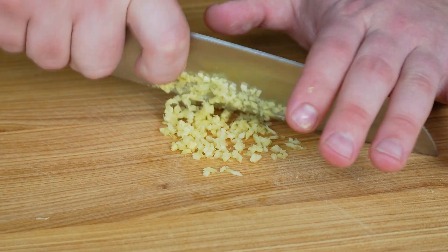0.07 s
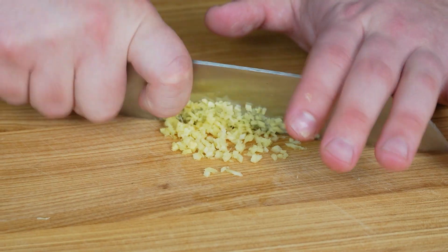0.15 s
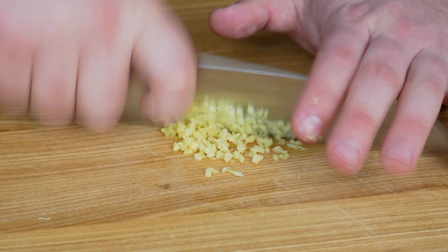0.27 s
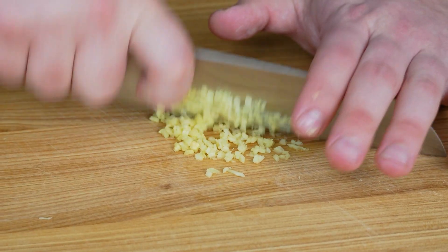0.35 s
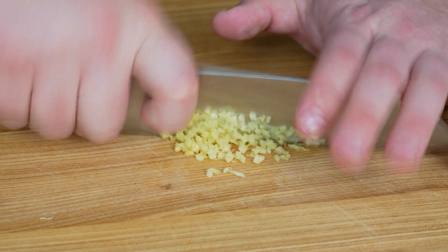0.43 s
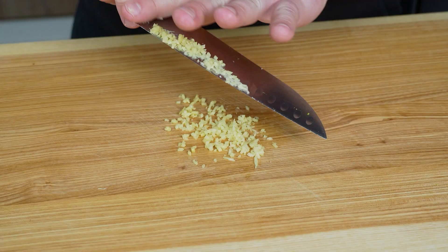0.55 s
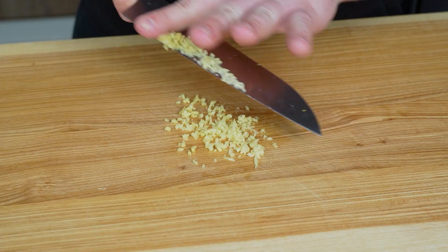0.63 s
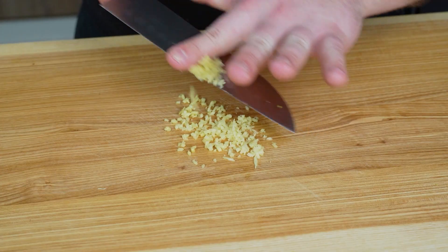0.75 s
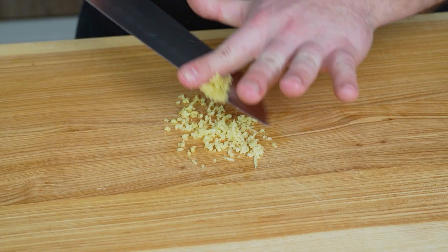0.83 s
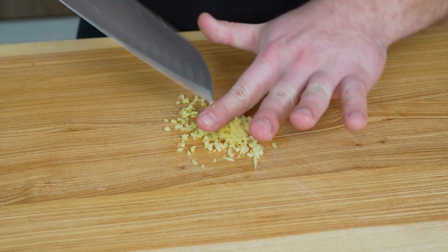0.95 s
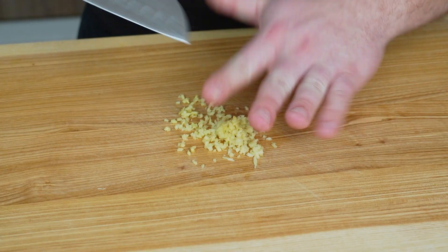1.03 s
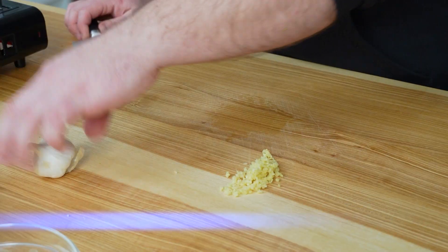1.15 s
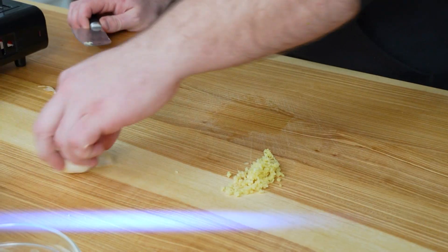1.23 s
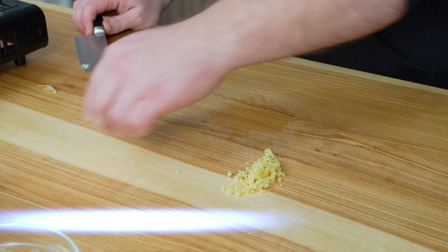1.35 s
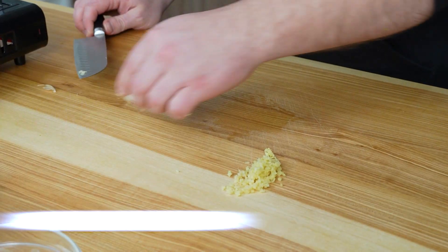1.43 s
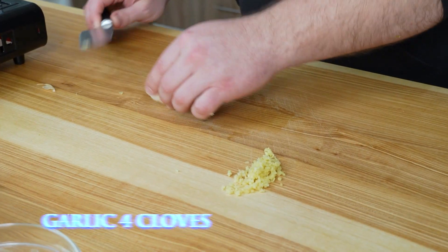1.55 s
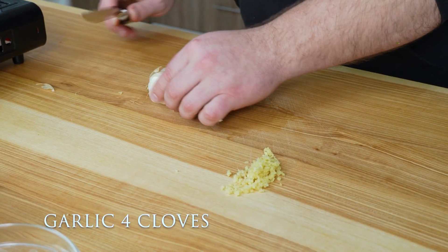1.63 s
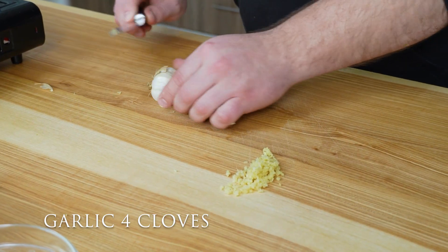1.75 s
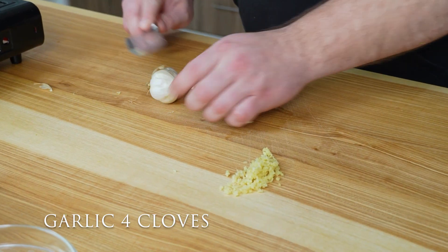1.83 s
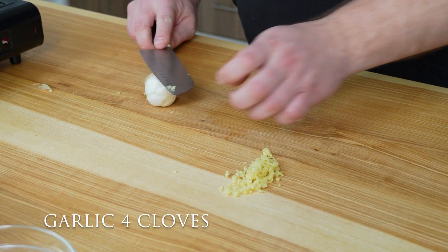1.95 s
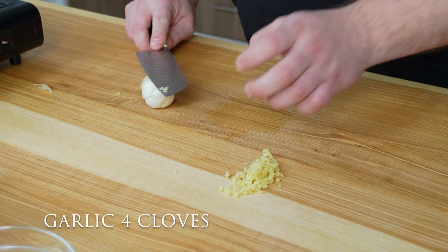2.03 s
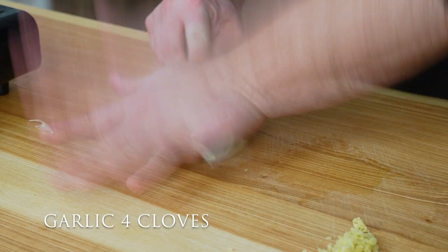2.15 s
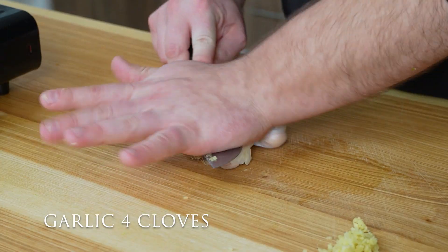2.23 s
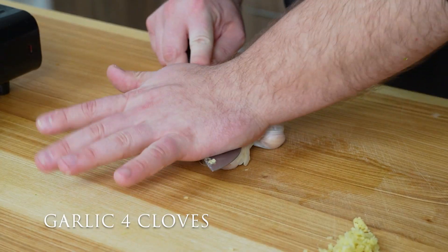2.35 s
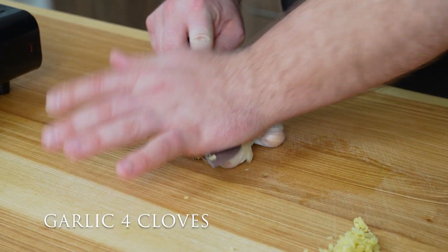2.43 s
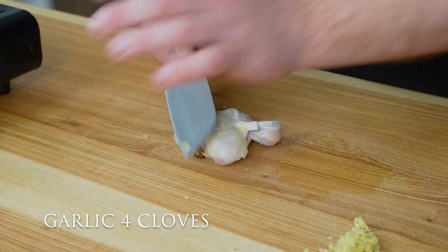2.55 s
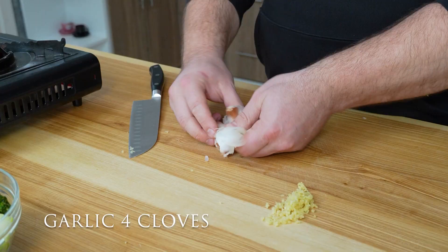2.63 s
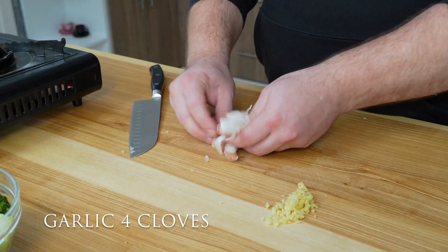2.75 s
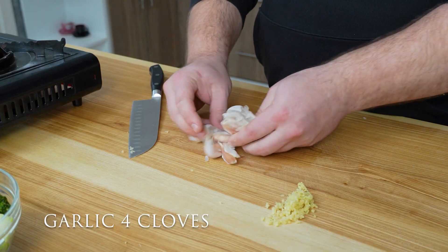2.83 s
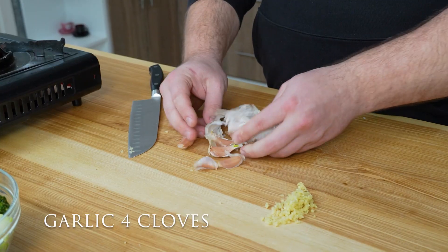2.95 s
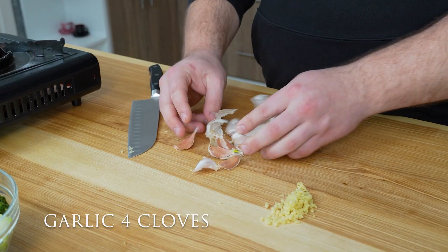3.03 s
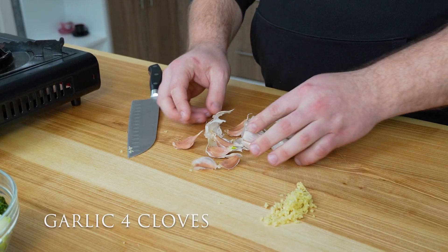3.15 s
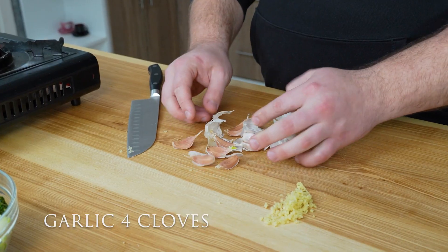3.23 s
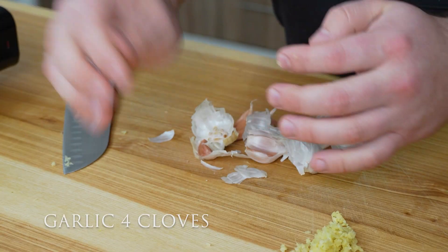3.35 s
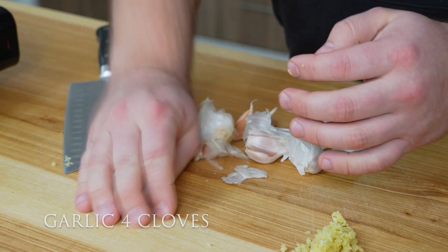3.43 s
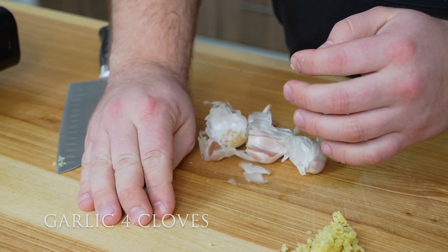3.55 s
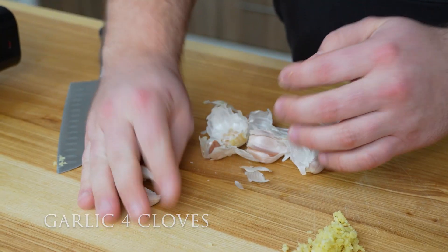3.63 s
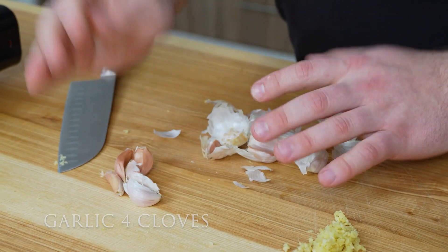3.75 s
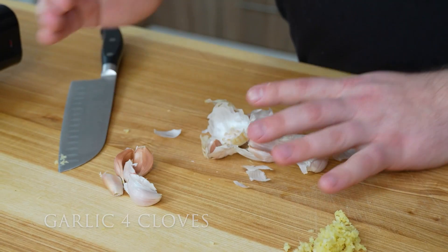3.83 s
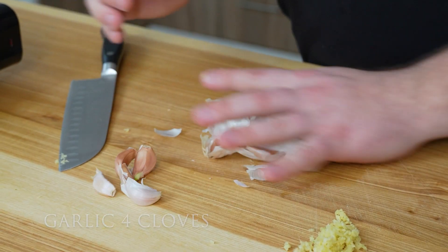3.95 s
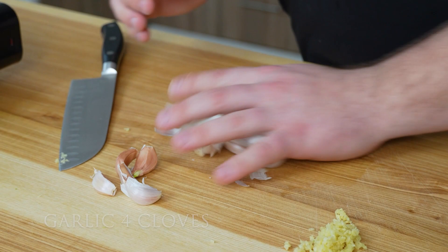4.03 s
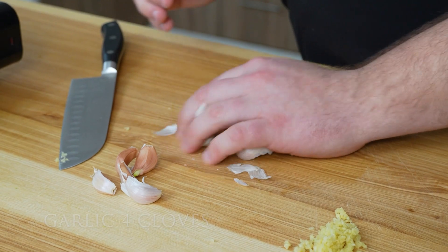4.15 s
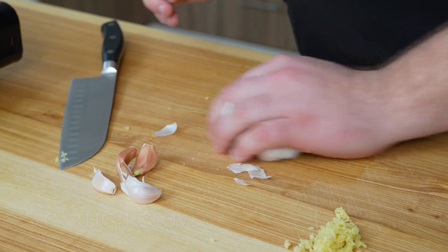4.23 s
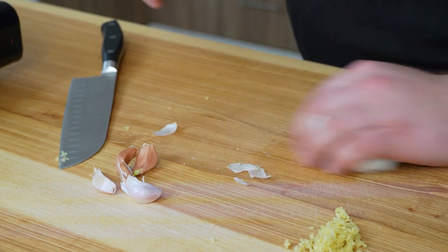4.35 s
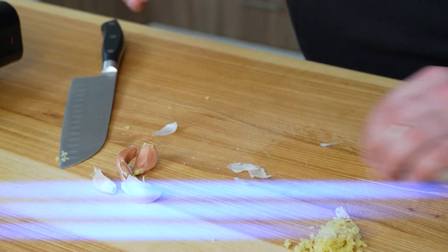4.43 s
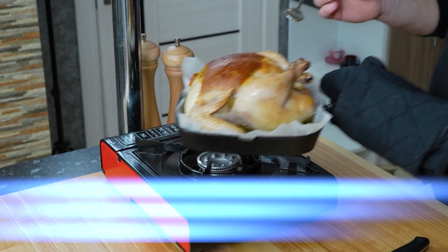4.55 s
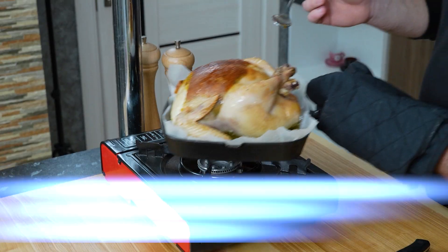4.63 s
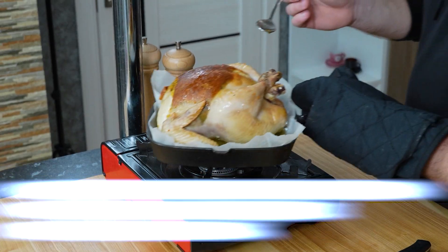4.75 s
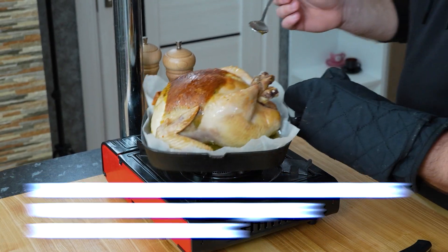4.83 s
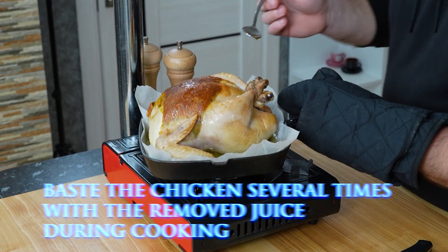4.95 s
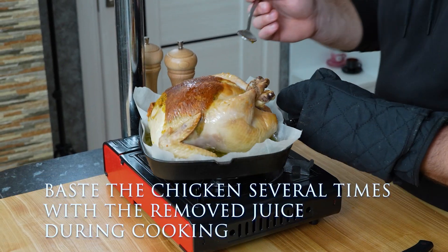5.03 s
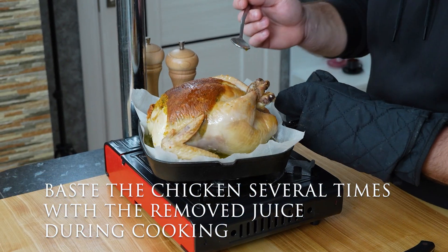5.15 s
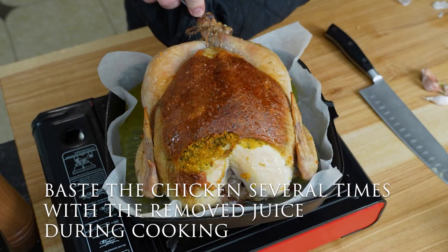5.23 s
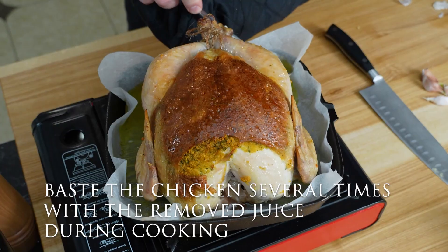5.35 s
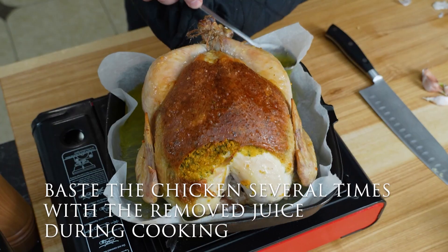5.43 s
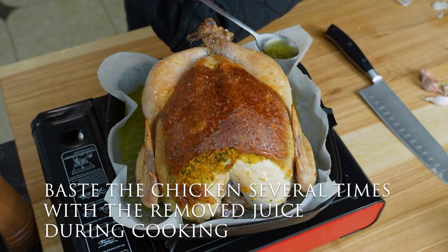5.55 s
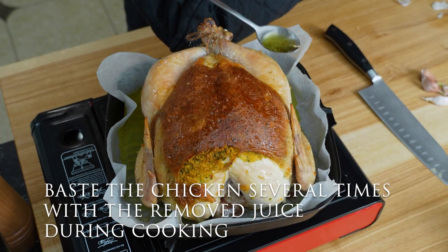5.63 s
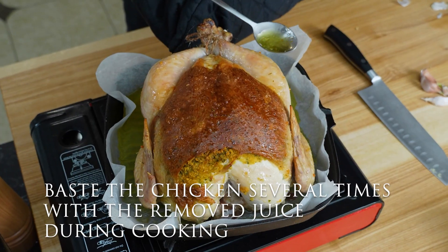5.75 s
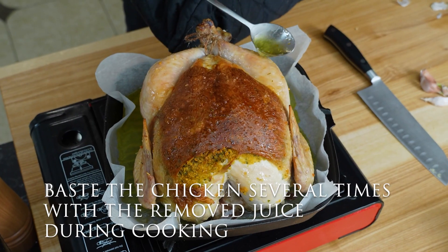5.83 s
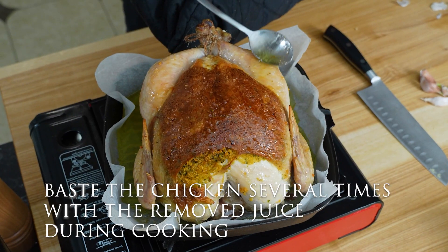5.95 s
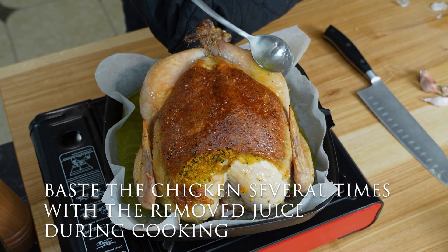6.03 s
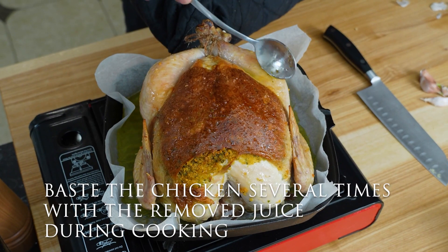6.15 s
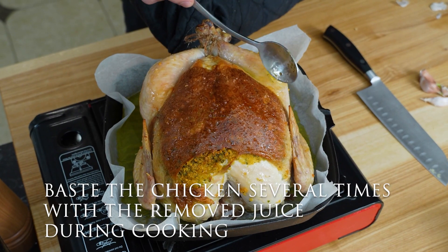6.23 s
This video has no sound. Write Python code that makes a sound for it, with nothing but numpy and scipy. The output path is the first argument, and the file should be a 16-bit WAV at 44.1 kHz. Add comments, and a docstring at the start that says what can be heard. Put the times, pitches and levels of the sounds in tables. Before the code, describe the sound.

Four knife chops on a wooden board, a garlic bulb smashed and peeled with papery crackles, then a pan clanks onto a stove in a ringing kitchen.

```python
"""Cooking in a bare, ringing kitchen, heard in five shots joined by hard cuts; faint air and a fan run on.
At the board a knife minces ginger and fingers wipe it off; a garlic bulb is set down, smashed under the
flat blade and pulled apart, and its husks are swept away. Then a pan clanks onto a portable stove and a
spoon dips into its juice. Blows are coloured noise bursts and struck modes, husks and paper are showers
of grains; noise echoes set the distance: the husks sound nearest, the smash deepest in the room."""
import sys
import numpy as np
from scipy import signal
from scipy.fft import rfft, irfft, next_fast_len
from scipy.io import wavfile
from scipy.ndimage import uniform_filter1d

SR = 44100
rng = np.random.default_rng(int(sys.argv[2]) if len(sys.argv) > 2 else 0)


def pcm_store(signal):
    """Save signal as 16-bit PCM."""
    levels = np.round(np.clip(np.atleast_2d(signal), -1, 1) * 32767)
    wavfile.write(sys.argv[1], SR, levels.astype(np.int16).T)


N = 276943
TOP_HZ = 16000  # upper limit of the sound
HIT_SIZE = 16384  # samples in a ringing hit
AGE = np.arange(HIT_SIZE) / SR  # s since a blow
TIME = np.arange(N) / SR  # s since the start


def amp(db):
    """Decibels to gain."""
    return 10 ** (np.asarray(db) / 20)


def fade(age, t60):
    """Exponential decay, 60 dB in t60 seconds."""
    return np.exp(-np.log(1000) * age / t60)


def level(x, db):
    """Set the rms level."""
    return x * amp(db) / np.std(x)


def add(track, s, hit, db):
    """Mix in a hit whose energy equals 10 ms at the given level."""
    unit_hit = hit / np.sqrt(np.sum(hit ** 2) / (SR / 100))
    part = track[int(s * SR):][:len(hit)]
    part += (unit_hit * amp(db))[:len(part)]


def colour(x, tone, tilt_db=0):
    """Causal minimum-phase filter through (frequency [Hz], density [dB per Hz]) points, tilted per octave."""
    size = next_fast_len(len(x) // 2 + 2048) * 2
    octave = np.log2(np.maximum(np.fft.rfftfreq(size, 1 / SR), 1))
    hz, db = np.transpose(tone)
    tilt = tilt_db * np.clip(octave, np.log2(200), np.log2(TOP_HZ))
    gain = amp(np.interp(octave, np.log2(hz), db) + tilt)
    # folding the cepstrum onto positive times makes the filter causal
    cepstrum = irfft(np.log(gain))
    cepstrum[1:size // 2] *= 2
    cepstrum[size // 2 + 1:] = 0
    return irfft(rfft(x, size) * np.exp(rfft(cepstrum)))[:len(x)]


def burst(t60, rise=0.00037, count=2, size=6144):
    """Countless short vibrations after a contact: dying noise with an even spectrum."""
    shape = fade(AGE[:size], t60) * (1 - np.exp(-AGE[:size] / rise))
    x = rng.standard_normal(size) * shape
    for _ in range(count):
        # flatten the spectrum, then restore the decay
        spectrum = rfft(x)
        even = irfft(spectrum / (np.abs(spectrum) + 1e-12))
        loudness = np.sqrt(np.abs(uniform_filter1d(even ** 2, 128)) + 1e-12)
        x = even * shape / loudness
    return x


def ring(modes, t60, low_hz=20, high_hz=16000, scatter_db=4.5):
    """Modes struck at a slightly new spot each time; the contact feeds those between low_hz and high_hz."""
    hz, db = np.transpose(modes)[:, :, None]
    size, detune = rng.standard_normal((len(modes), 2)).T[:, :, None]
    contact_loss = np.sqrt((1 + (hz / high_hz) ** 4) * (1 + (low_hz / hz) ** 4))
    gain = amp(db + scatter_db * size) / contact_loss
    side = rng.choice([-1, 1], hz.shape)
    tones = np.sin(2 * np.pi * hz * (1 + 0.012 * detune) * AGE)
    return fade(AGE, t60) * np.sum(side * gain * tones, axis=0)


def contacts(rows, tone):
    """One coloured burst for each row (time [s], level [dB], t60 [s], brightness [dB per octave])."""
    out = np.zeros(N)
    for s, db, t60, tilt_db, *_ in rows:
        add(out, s, colour(burst(t60), tone, tilt_db), db)
    return out


def crackle(tone, rate, spread_db, grain_t60, rub_db, size=256, count=3000):
    """Tiny fractures, each with its own pitch and a very unequal size, over a smooth rubbing hiss; rms 1."""
    length = int(count / rate * SR)
    when, pitch, luck = rng.random((count, 3)).T[:, :, None]
    strength = amp(spread_db * np.minimum(-np.log(luck), 4))
    tones = np.sin(2 * np.pi * TOP_HZ * pitch * AGE[:size])
    grains = strength * fade(AGE[:size], grain_t60) * tones
    places = (when * length).astype(int) + np.arange(size)
    shower = np.bincount(places.ravel(), grains.ravel(), length)[:length]
    hiss = amp(rub_db) * rng.standard_normal(length)
    return level(colour(level(shower, 0) + hiss, tone), 0)


RUB_RANGE_DB = 30  # rise within one attack time, fall within one release time


def rubbing(rows, attack_s, release_s):
    """Gain of a series of rubs (time [s], hold [s], level [dB]): each swells, holds and dies away."""
    power = 0
    for s, hold_s, db in rows:
        before = np.maximum(s - TIME, 0) / attack_s
        after = np.maximum(TIME - s - hold_s, 0) / release_s
        power = power + amp(db - RUB_RANGE_DB * np.minimum(before + after, 10)) ** 2
    return np.sqrt(power)


def kitchen(early_db, late_db, treble_db, early_t60=0.047, t60_low=0.4, t60_mid=0.54, t60_top=0.33,
            gap=0.0034, build=0.0013):
    """Echo of the room: direct sound, quick returns from worktop and cupboards, then a long dense tail."""
    age = np.arange(SR) / SR
    octave = np.log2(np.maximum(np.fft.rfftfreq(SR, 1 / SR), 1))
    centres = np.log2([250, 1000, 4000, 14000])
    early = amp(early_db) * fade(age, early_t60) / np.linalg.norm(fade(age, early_t60))
    noise, echo = rfft(rng.standard_normal(SR)), 0
    band_t60s = (t60_low, t60_mid, t60_mid, t60_top)
    band_dbs = (0, 0, treble_db / 2, treble_db)
    # treble_db sets how much treble returns; the tail of the top band dies soonest
    for share, t60, db in zip(np.eye(4), band_t60s, band_dbs):
        late = amp(late_db) * fade(age, t60) / np.linalg.norm(fade(age, t60_mid))
        band = irfft(noise * np.interp(octave, centres, share), SR)
        echo = echo + band * np.hypot(early, late) * amp(db)
    onset = 1 - np.exp(-np.maximum(age - gap, 0) / build)
    return (age == 0) + echo * onset


# spectrum of the air in the kitchen: (frequency [Hz], density [dB per Hz])
AIR_SPECTRUM = [(15, -26.5), (25, -1), (48, -3), (62, -9.5), (100, -3.5), (170, -8), (280, -9), (450, -5.5),
                (680, -10.5), (920, -8), (1300, -17), (2200, -22.5), (3900, -27.5), (4400, -32.5),
                (8000, -39), (12500, -42.5), (16000, -55.5)]
AIR_DB = -69  # rms
# whirr of a fan: (centre [Hz], width [Hz], rms level [dB])
FAN_BANDS = [(326.8, 15, -82), (454, 14, -77.5), (674, 25, -79), (907.5, 36, -84.5), (3600, 180, -89)]


def room_tone():
    """Faint steady air, shaped noise, with the narrow noise bands of a fan."""
    out = level(colour(rng.standard_normal(N), AIR_SPECTRUM), AIR_DB)
    size = next_fast_len(N)
    f, noise = np.fft.rfftfreq(size, 1 / SR), rfft(rng.standard_normal(size))
    for hz, width, db in FAN_BANDS:
        band = irfft(noise / (1 + (2 * (f - hz) / width) ** 2), size)[:N]
        out += level(band, db)
    return out


# dry husk under the fingers: (frequency [Hz], density [dB per Hz])
HUSK_SPECTRUM = [(150, -20.5), (380, -18.5), (540, 1), (800, -7), (1200, -5.5), (2100, -2), (3500, 4),
                 (5200, 5), (7000, -2.5), (12500, -8), (16000, -11)]
# fingers wiping ginger off the blade, then brushing the board: (time [s], hold [s], level [dB])
WIPES = [(.63, .02, -92), (1.02, 0.037, -81.5), (1.36, 0.048, -68), (1.69, .02, -87), (1.83, .01, -78)]
WIPE_ATTACK_S, WIPE_RELEASE_S = 0.23, 0.29


def wiping():
    """Fingertips wipe and brush: more smooth hiss than grains."""
    wipe = crackle(HUSK_SPECTRUM, rate=2000, spread_db=2, grain_t60=.004, rub_db=4)
    return np.resize(wipe, N) * rubbing(WIPES, WIPE_ATTACK_S, WIPE_RELEASE_S)


# baking paper in the pan: (frequency [Hz], density [dB per Hz])
PAPER_SPECTRUM = [(300, -25.5), (900, 3), (1500, -4), (2500, -3.5), (5300, -9), (7000, -19), (11000, -21.5),
                  (16000, -37.5)]
# its rustles: (time [s], hold [s], level [dB])
RUSTLES = [(4.84, .15, -64.5), (5.29, 0.038, -63.5)]
RUSTLE_ATTACK_S, RUSTLE_RELEASE_S = 0.16, 0.15


def rustling_paper():
    """Creases give one by one in the baking paper, over a rubbing hiss."""
    paper = crackle(PAPER_SPECTRUM, rate=1900, spread_db=4.5, grain_t60=.004, rub_db=3)
    return np.resize(paper, N) * rubbing(RUSTLES, RUSTLE_ATTACK_S, RUSTLE_RELEASE_S)


# snap of dry husk: (frequency [Hz], density [dB per Hz])
SNAP_SPECTRUM = [(200, -28), (600, -38), (1200, -3), (2200, 2.5), (3600, 5.5), (5200, 7), (6800, 1.5),
                 (9000, 1.5), (13000, -2), (16000, -8.5)]
# single snaps: (time [s], level [dB], t60 [s], brightness [dB per octave])
HUSK_SNAPS = [(1.262, -52.5, 0.26, 1.5), (1.291, -48.5, 0.11, -1.5), (1.323, -40.5, 0.19, -1),
              (1.568, -63, 0.023, 14), (1.615, -55.5, 0.059, -1.5), (1.6442, -45, 0.098, 2),
              (1.939, -61, .095, -0.5), (1.9621, -37.5, 0.1, 1), (2.376, -38.5, 0.023, -2),
              (2.608, -47, .012, -2), (2.6707, -41.5, 0.055, 3), (3.3172, -59.5, .02, -2),
              (4.158, -39.5, 0.12, 0), (4.173, -42.5, 0.031, -5.5), (4.5006, -46, 0.0046, -5)]


def husk_snaps():
    """Papery skins snap when touched: short dry bursts."""
    return contacts(HUSK_SNAPS, SNAP_SPECTRUM)


# pulls on the husk: (time it gives [s], hold [s], crackle level [dB])
PULLS = [(2.532, 0.084, -53), (2.706, .01, -44.5), (2.728, 0.019, -39), (2.824, 0.014, -42),
         (2.911, 0.13, -48), (3.168, 0.0083, -55.5), (3.457, 0.043, -65.5)]
PULL_ATTACK_S, PULL_RELEASE_S = 0.09, 0.2
# the snap that ends the build-up: level over the crackle, decay, brightness per octave
GIVE_DB, GIVE_T60_S, GIVE_TILT_DB = 4.5, 0.11, -1.5


def peeling():
    """The crackle builds, the skin gives with a snap, the fingers work on."""
    gives = [(s, db + GIVE_DB, GIVE_T60_S, GIVE_TILT_DB) for s, _, db in PULLS]
    peel = crackle(HUSK_SPECTRUM, rate=4000, spread_db=3.9, grain_t60=.004, rub_db=-4, count=5000)
    pulled = np.resize(peel, N) * rubbing(PULLS, PULL_ATTACK_S, PULL_RELEASE_S)
    return contacts(gives, SNAP_SPECTRUM) + pulled


# husks under the flat hand: (frequency [Hz], density [dB per Hz])
FLAT_HAND_SPECTRUM = [(180, -68), (300, -16), (425, -20), (678, -9.5), (870, -11), (1390, -6.5),
                      (2000, -9.5), (3700, -2.5), (7200, -13), (12700, -17.5), (16000, -22)]
# husks under the cupped hand: (frequency [Hz], density [dB per Hz])
CUPPED_HAND_SPECTRUM = [(240, -56.5), (400, -29), (528, -33), (645, -40), (994, -16), (1200, -14),
                        (1840, -19), (3310, -7), (6850, -15.5), (12700, -20), (16000, -27)]
SWEEP_START_S, SWEEP_LEAVES_S, SWEEP_SPEEDUP_S = 3.927, 4.49, 0.2
# level at full speed before any gathering, gain from gathering, loss as the hand leaves the board
SWEEP_DB, GATHER_DB_PER_S, LEAVE_DB_PER_S = -48, 5.5, 103


def sweeping(cupping=(4.26, 4.38)):
    """Husks slide over the wood, louder with speed and load, as the hand closes on them, until the cut."""
    flat, cupped = (np.resize(crackle(tone, rate=4000, spread_db=3.4, grain_t60=.004, rub_db=-3), N)
                    for tone in (FLAT_HAND_SPECTRUM, CUPPED_HAND_SPECTRUM))
    closed = np.interp(TIME, cupping, (0, 1))
    age = np.maximum(TIME - SWEEP_START_S, 0)
    speed = np.minimum(age / SWEEP_SPEEDUP_S, 1) * (TIME < SHOTS[2][1])
    leaving = LEAVE_DB_PER_S * np.maximum(TIME - SWEEP_LEAVES_S, 0)
    db = SWEEP_DB + GATHER_DB_PER_S * age - leaving
    return speed * amp(db) * (flat * np.sqrt(1 - closed) + cupped * np.sqrt(closed))


# spoon on the paper lining: (frequency [Hz], density [dB per Hz])
SPOON_SPECTRUM = [(400, -42), (800, -24), (1300, 0.5), (1700, -11.5), (2000, 0.5), (2350, -2.5),
                  (2900, -15), (3600, -9), (5500, -18), (9000, -28.5), (16000, -50)]
# its scrapes: (time [s], level [dB], t60 [s], brightness [dB per octave])
SCRAPES = [(5.402, -53.5, 0.13, 2), (5.4124, -48.5, .05, 0)]
# spoon in the juice: (frequency [Hz], density [dB per Hz])
JUICE_SPECTRUM = [(150, -48), (250, -33), (398, 3), (524, -12.5), (1020, -8), (1550, -24), (3210, -39),
                  (3660, -49), (8000, -70), (10400, -91), (17600, -120)]
# its dips: (time [s], level [dB], brightness [dB per octave])
DIPS = [(5.615, -49.5, -1), (5.781, -56.5, 5)]
# the bowl lands after the tip, duller: delay, level change, change of brightness per octave
BOWL_S, BOWL_DB, BOWL_TILT_DB = 0.022, 1, -10
DIP_T60_S, DIP_RING_DB = 0.068, -8
# modes of pan and stove top: (frequency [Hz], relative level [dB])
PAN_MODES = [(395, -9.5), (620, -4.5), (875, -2), (915, -6), (1019, -3), (1330, -13), (1570, 0.5),
             (1802, -5.5), (2505, -6), (2740, -6.5), (3034, -3), (3230, -7.5), (3400, -3), (3830, -8.5),
             (4730, -12), (5480, -6.5)]
PAN_T60 = .11  # s


def spoon():
    """The spoon scrapes the lining, then tip and bowl dip in the juice, feeding mostly the pan's low modes."""
    tips = [(s, db, DIP_T60_S, tilt_db) for s, db, tilt_db in DIPS]
    bowls = [(s + BOWL_S, db + BOWL_DB, DIP_T60_S, tilt_db + BOWL_TILT_DB) for s, db, tilt_db in DIPS]
    out = contacts(SCRAPES, SPOON_SPECTRUM) + contacts(tips + bowls, JUICE_SPECTRUM)
    for s, db, *_ in tips + bowls:
        add(out, s, ring(PAN_MODES, PAN_T60, high_hz=280.4), db + DIP_RING_DB)
    return out


# modes of the blade: (frequency [Hz], relative level [dB])
BLADE_MODES = [(2620, -1), (2980, -6), (3520, -5), (3830, -4.5), (4872, -5), (5198, 0.5), (5395, 4.5)]
# the blade touched or jolted: (time [s], level [dB])
BLADE_TAPS = [(1.961, -50), (2.234, -45), (3.317, -71), (3.503, -47)]
BLADE_T60 = .3  # s


def blade_ringing():
    """The steel rings on in its high modes when touched or jolted."""
    out = np.zeros(N)
    for s, db in BLADE_TAPS:
        add(out, s, ring(BLADE_MODES, BLADE_T60), db)
    return out


# slow swings of the table top: (frequency [Hz], relative level [dB], t60 [s])
TABLE_SWINGS = [(28, -25.5, 0.55), (43.3, -33, .45), (82, -7.5, 0.09), (102, -0.5, 0.068)]


def thud(low_hz=10, rise=.007):
    """The whole table top bouncing; a light blow hardly moves its swings below low_hz."""
    swings = 0
    for hz, db, t60 in TABLE_SWINGS:
        gain = amp(db) / np.hypot(1, (low_hz / hz) ** 2)
        swings = swings + gain * np.sin(2 * np.pi * hz * AGE) * fade(AGE, t60)
    return swings * (1 - np.exp(-(AGE / rise) ** 2))


# modes of the board: (frequency [Hz], relative level [dB])
BOARD_MODES = [(205, -13.5), (275, 0), (345, -9), (400, -5), (545, -0.5), (760, -3.5), (825, -1.5),
               (980, 8.5), (1061, -10.5), (1502, -2.5), (1640, -15.5), (2073, -24)]
BOARD_T60 = .085  # s
# soft blows: (time [s], level before grain_db and modes_db [dB], upper edge of push [Hz], table thud [dB])
KNOCKS = [(1.297, -46, 730, -66), (1.646, -51.5, 320, -60.5), (1.964, -36, 400, -51.5),
          (2.232, -35, 690, -35.5), (3.498, -30.5, 1070, -44.5)]
# every blow settles with a softer bump: delay, level change, share of the push's upper edge
SETTLE_S, SETTLE_DB, SETTLE_SOFTNESS = .019, -3.5, .8


def knocks(grain_db=-3, modes_db=-3, low_hz=200):
    """Bulb and hand meet the board and settle; the softer the contact, the fewer modes it wakes."""
    out = np.zeros(N)
    settling = [(s + SETTLE_S, db + SETTLE_DB, hz * SETTLE_SOFTNESS, thud_db + SETTLE_DB)
                for s, db, hz, thud_db in KNOCKS]
    for s, db, push_hz, thud_db in list(KNOCKS) + settling:
        edges = [min(low_hz, 0.94 * push_hz), 1.3 * push_hz]
        push_filter = signal.butter(2, edges, "band", fs=SR, output="sos")
        wood = signal.sosfilt(push_filter, burst(BOARD_T60))
        add(out, s, wood, db + grain_db)
        add(out, s, ring(BOARD_MODES, BOARD_T60, high_hz=push_hz), db + modes_db)
        add(out, s, thud(), thud_db)
    return out


# palm on the board: (frequency [Hz], density [dB per Hz])
SLAP_SPECTRUM = [(30, -21), (55, -3), (100, -15), (270, 5.5), (500, -4.5), (850, -4), (1250, -16),
                 (2400, -12), (3400, -20), (5300, -18.5), (7000, -28.5), (16000, -34.5)]
# its slap: (time [s], level [dB], t60 [s], brightness [dB per octave])
SLAPS = [(3.503, -25, 0.099, 0)]


def palm_slap():
    """The palm slaps the board: a full, low burst."""
    return contacts(SLAPS, SLAP_SPECTRUM)


# pan against stove: (frequency [Hz], density [dB per Hz])
PAN_SPECTRUM = [(35, -52), (70, -28), (240, -31), (390, -12), (560, -5), (700, -10.5), (950, 5), (1150, -5),
                (1700, -3), (3100, -3), (4200, -12.5), (5600, -15.5), (8000, -25), (11000, -36.5),
                (16000, -48)]
# the pan meeting the stove: (time [s], level [dB], t60 [s], brightness [dB per octave], ring [dB])
CLANKS = [(4.9942, -29, 0.044, 1, -26), (5.0006, -16, 0.034, 1.1, -21), (5.099, -25.5, 0.043, 2, -29),
          (5.106, -30.5, 0.028, -4.5, -40), (5.17, -35, 0.33, -6.5, -40.5), (5.21, -33.5, 0.09, -2, -50),
          (5.222, -33.5, 0.019, -7.5, -65)]


def roasting_pan():
    """The pan lands, rocks and settles: each contact is a burst that also strikes the metal's modes."""
    out = contacts(CLANKS, PAN_SPECTRUM)
    for s, *_, ring_db in CLANKS:
        add(out, s, ring(PAN_MODES, PAN_T60), ring_db)
    return out


# knife on ginger and wood: (frequency [Hz], density [dB per Hz])
CHOP_SPECTRUM = [(90, -24), (150, -20), (280, -6.5), (420, -34), (545, -1), (649, -9.5), (770, 5),
                 (871, -3), (970, 0.5), (1200, -8), (1560, -9), (2300, -17), (3000, -23.5), (4860, -26.5),
                 (6000, -36), (16000, -45)]
# strokes: (time [s], dense wood [dB], board modes [dB], brightness [dB per octave], table thud [dB])
CHOPS = [(.046, -39, -54, -1.6, -43.5), (.203, -44.5, -39, 2, -51), (0.355, -43.5, -43, 1.7, -49.5),
         (0.509, -40.5, -40.5, 0.5, -48)]


def mincing(crunch_db=-13, crunch_lead=0.016, landing=0.0014):
    """The edge crunches through the ginger, then lands on the board."""
    out = np.zeros(N)
    for s, wood_db, modes_db, tilt_db, thud_db in CHOPS:
        # the crunch swells just ahead of the knock
        crunch = colour(burst(0.12, rise=0.0089), CHOP_SPECTRUM)
        add(out, max(s - crunch_lead, 0), crunch, wood_db + crunch_db)
        add(out, s, colour(burst(0.1, rise=0.0015), CHOP_SPECTRUM, tilt_db), wood_db)
        board = ring(BOARD_MODES, BOARD_T60, low_hz=644, high_hz=2520)
        add(out, s, board * (1 - np.exp(-AGE / landing)), modes_db)
        add(out, s, thud(low_hz=100), thud_db)
    # the room still rings from the stroke before
    add(out, 0, colour(burst(0.26), CHOP_SPECTRUM), -55)
    return out


# bulb under the blade: (frequency [Hz], density [dB per Hz])
SMASH_SPECTRUM = [(25, -6), (45, -9.5), (100, -7.5), (200, -12.5), (420, -0.5), (750, -6.5), (1800, -3),
                  (3300, 0), (5300, -3), (8000, -9), (12000, -11.5), (16000, -19.5)]
# its bursting: (time [s], level [dB], t60 [s], brightness [dB per octave])
SMASHES = [(2.2262, -31.5, 0.04, 2.5), (2.2295, -23, 0.048, 6), (2.2322, -17, 0.041, 0.5),
           (2.245, -32, 0.045, 0.5)]


def smashing():
    """The bulb bursts under the flat blade: a quick run of wide-band cracks."""
    return contacts(SMASHES, SMASH_SPECTRUM)


# the five shots between the cuts: (start [s], end [s])
SHOTS = [(0, .607), (.607, 2.127), (2.127, 4.568), (4.568, 5.288), (5.288, 6.3)]


def scene():
    """Every source has its own share of the room; each cut chops the echo off."""
    husks = husk_snaps() + peeling() + wiping() + sweeping()
    blows = knocks() + blade_ringing() + palm_slap()
    pan = roasting_pan() + spoon() + rustling_paper()
    # more echo against the direct sound puts a source farther from the microphone
    sources = [(husks, kitchen(early_db=-16, late_db=-1.5, treble_db=-5)),
               (blows, kitchen(early_db=-5.5, late_db=-2.5, treble_db=1.5)),
               (pan, kitchen(early_db=-6.5, late_db=-0.5, treble_db=-3.5)),
               (mincing(), kitchen(early_db=-0.5, late_db=-0.5, treble_db=-2.5)),
               (smashing(), kitchen(early_db=-5, late_db=5.5, treble_db=-8))]
    out = room_tone()
    for start, end in SHOTS:
        shot = slice(int(start * SR), min(int(end * SR), N))
        closing = np.clip((end - TIME[shot]) / .002, 0, 1)  # 2 ms fade into the cut
        for sound, echo in sources:
            out[shot] += closing * signal.fftconvolve(sound[shot], echo)[:len(closing)]
    return out[None]


def record(dry):
    """The recorder behind the microphone cuts the top with a steep low-pass."""
    return signal.sosfilt(signal.ellip(10, .2, 80, TOP_HZ, fs=SR, output="sos"), dry)


dry = scene()
out = record(dry)
pcm_store(out)
```